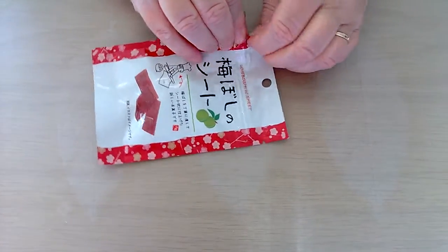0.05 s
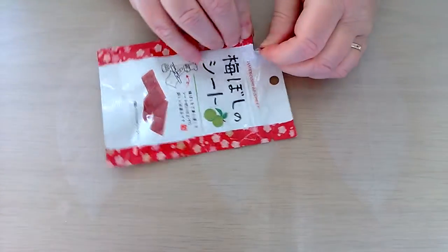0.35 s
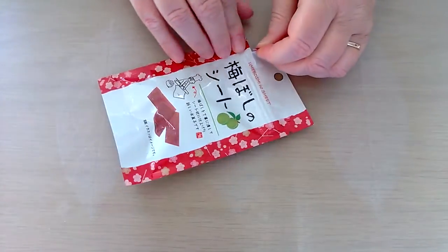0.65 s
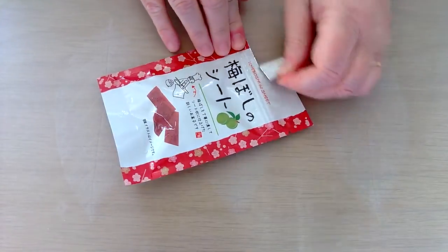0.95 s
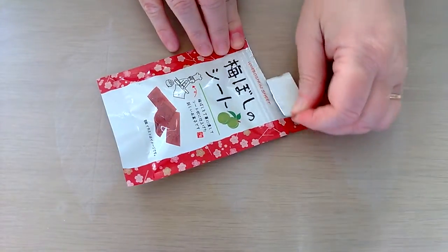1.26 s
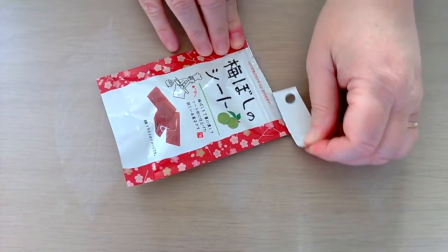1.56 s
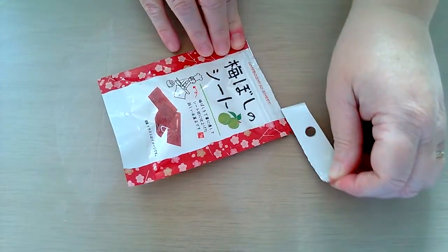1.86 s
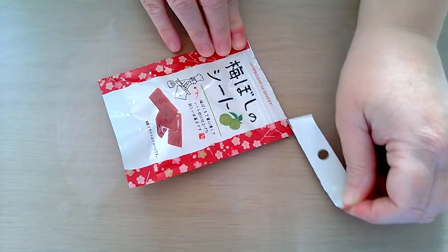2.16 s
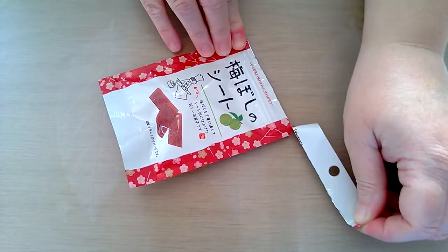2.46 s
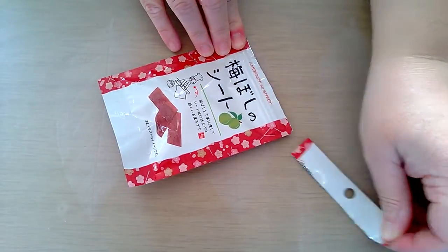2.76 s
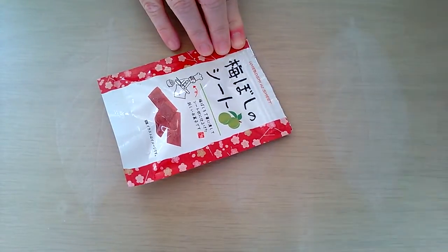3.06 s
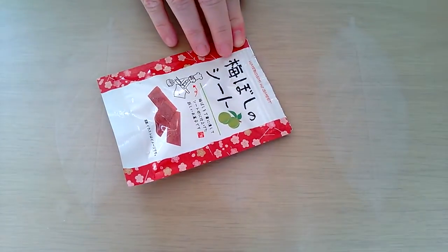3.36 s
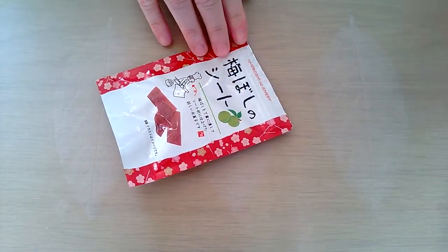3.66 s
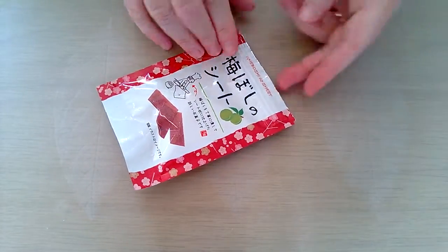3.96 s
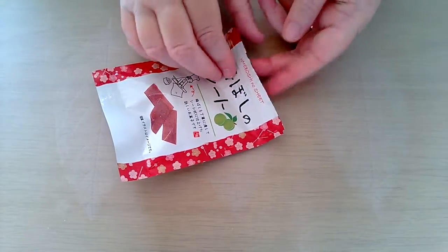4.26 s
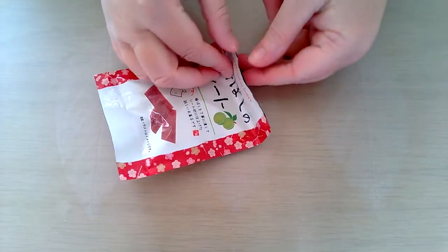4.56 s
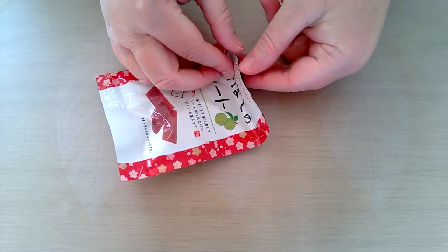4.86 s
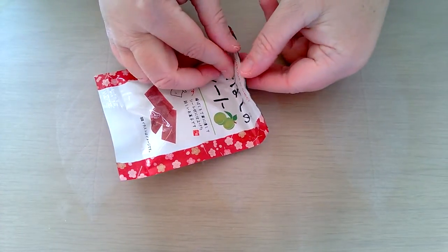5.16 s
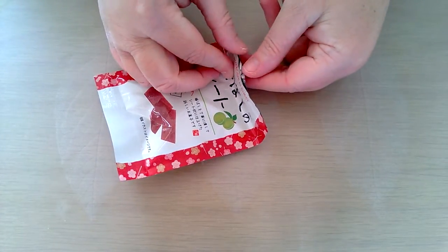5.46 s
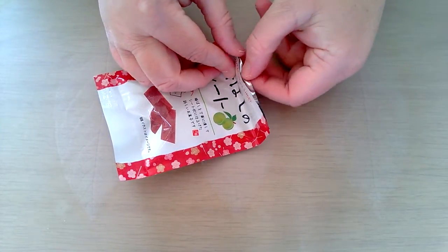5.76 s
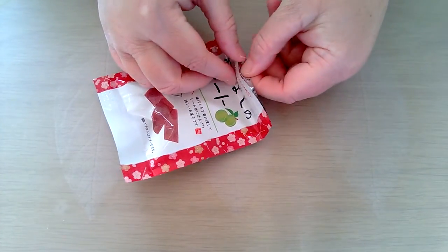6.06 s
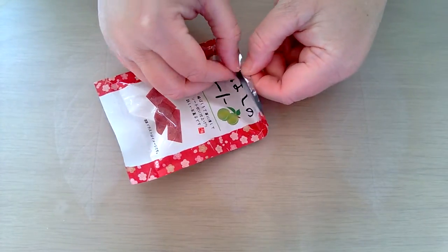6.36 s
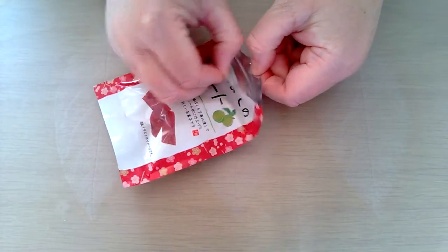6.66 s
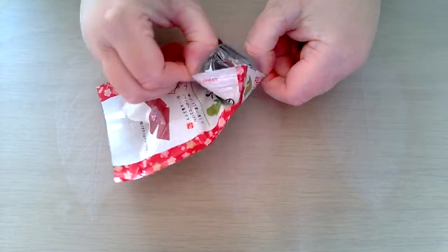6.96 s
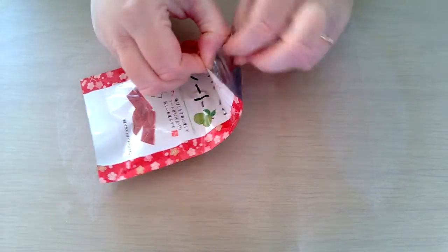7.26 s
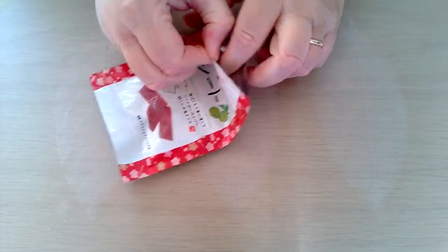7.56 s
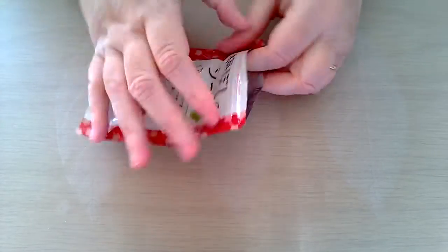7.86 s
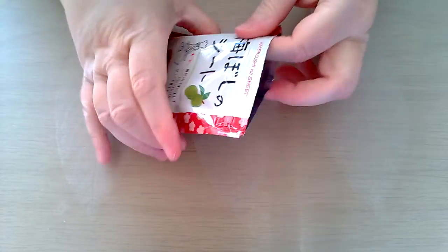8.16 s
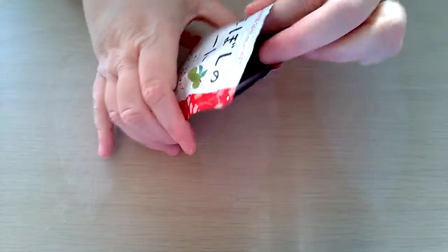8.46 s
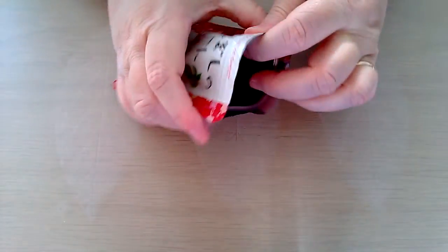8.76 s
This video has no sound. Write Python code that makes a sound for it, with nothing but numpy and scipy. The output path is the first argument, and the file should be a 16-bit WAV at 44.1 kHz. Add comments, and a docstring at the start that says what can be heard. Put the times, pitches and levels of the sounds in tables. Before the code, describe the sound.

Close snaps and crackles of a foil packet being opened on a table, with a small bird warbling and squawking in the background.

```python
"""Sharp snaps and a fine crinkle, close by: two hands tear the top strip off a foil snack pouch,
pick at its zip and pull it open, bumping and scuffing the table. Each snap is a crease flipping over;
many tiny creases make the crinkle. Across the room a small bird warbles in gliding whistles and
squawks with chopped air. A thin electronic whine lies over the quiet room."""
import sys
import numpy as np
from scipy import signal
from scipy.fft import rfft, irfft
from scipy.io import wavfile
from scipy.ndimage import uniform_filter1d

SR = 44100
rng = np.random.default_rng(int(sys.argv[2]) if len(sys.argv) > 2 else 0)


def wav_record(signal):
    """Record a signal, one row per channel, as 16-bit PCM in the file named by sys.argv[1]."""
    frames = np.transpose(np.atleast_2d(signal))
    bounded = np.clip(frames, -1, 1)
    # unit amplitude maps onto the largest positive 16-bit level
    quanta = np.round(bounded * 32767).astype(np.int16)
    wavfile.write(sys.argv[1], SR, quanta)


N = 392931
TIME = np.arange(N) / SR


def from_db(db):
    return 10 ** (np.asarray(db) / 20)


def rms_one(x):
    return x / np.sqrt(np.mean(x ** 2) + 1e-20)


def unit_energy(x):
    return x / np.sqrt(np.sum(x ** 2) + 1e-20)


def at_hz(points, hz):
    """Read between a table's rows on a log-frequency axis."""
    pitches, values = np.transpose(points)
    return np.interp(np.log(np.maximum(hz, 1)), np.log(pitches), values)


def add(track, s, sound):
    """Mix a sound into a track from time s on."""
    i = int(np.clip(s * SR, 0, N - 1))
    track[i:i + len(sound)] += sound[:N - i]


def colour(x, spectrum, size=4096):
    """Give a sound the tone of a (frequency, level) table; white noise keeps its power."""
    gains = from_db(at_hz(spectrum, np.fft.rfftfreq(size, 1 / SR)))
    cepstrum = irfft(np.log(gains))
    cepstrum[1:size // 2] *= 2  # minimum phase: nothing rings ahead of a click
    cepstrum[size // 2 + 1:] = 0
    response = irfft(np.exp(rfft(cepstrum)))
    return signal.oaconvolve(x, unit_energy(response))[:N]


def drift(rate, t):
    """A random wander that takes a new value, of size about 1, rate times a second."""
    knots = rng.standard_normal(int(t[-1] * rate) + 2)
    return np.interp(t * rate, np.arange(len(knots)), knots)


def swell(t, length, edge_s):
    """Fade in over edge_s, and out again after length; shorter calls never reach full level."""
    rise = np.clip(t / edge_s, 0, 1)
    fall = np.clip((length + edge_s - t) / edge_s, 0, 1)
    return np.sin(np.pi / 2 * rise * fall) ** 2


# tone of the quiet room and of the high hiss: (frequency [Hz], relative level [dB])
ROOM_TONE = [(20, -6), (45, -1), (70, -2), (120, 5), (175, -3), (205, -3), (240, 5), (290, -5), (480, -4),
             (700, -9), (1500, -10), (3000, -15), (6000, -31), (12000, -33)]
HISS_TONE = [(11500, -45), (13000, -14), (14500, -4), (15600, 0), (16300, -8), (17000, -25)]
def background(whine_hz=15623.8):
    """Low room noise, and the electronics' high hiss and unsteady whine."""
    air = from_db(-61.5) * colour(rng.standard_normal(N), ROOM_TONE)
    hiss = from_db(-64) * colour(rng.standard_normal(N), HISS_TONE)
    phase = 2 * np.pi * whine_hz * TIME + .3 * drift(500, TIME)
    whine = from_db(-51) * np.sqrt(2) * np.sin(phase)
    return air + hiss + whine


# how long the room rings: (frequency [Hz], time to fade by 60 dB [s])
ROOM_FADE = [(300, 0.49), (3000, 0.25), (6000, 0.24), (16000, 0.19)]
def room(x, gap_s, dense_s):
    """The room's echoes: a few after a gap, then ever more, with the treble dying first."""
    t, tail = TIME[:SR // 2], 0
    density = np.minimum((t / dense_s) ** 2 + 0.0033, 1)  # share of samples that hold an echo
    echoes = rng.standard_normal(len(t)) * (rng.random(len(t)) < density) / np.sqrt(density)
    edges = np.geomspace(100, 17000, 13)
    for low, high in zip(edges, edges[1:]):
        band = signal.sosfiltfilt(signal.butter(2, [low, high], "band", fs=SR, output="sos"), echoes)
        tail = tail + band * 1000. ** (-t / at_hz(ROOM_FADE, np.sqrt(low * high)))
    fade_in = np.clip(t / gap_s - 1, 0, 1)
    return signal.oaconvolve(x, unit_energy(tail * fade_in))[:N]


MIDDLE_NOTE_HZ = 3006
def warble(notes, waver, waver_hz, edge_s, buzz, buzz_hz):
    """The bird sings each note as a gliding, wavering, buzzy tone with a weak octave above."""
    out, t = np.zeros(N), TIME[:SR // 6]
    for s, length, first_hz, last_hz, db in notes:
        glide_hz = first_hz * (last_hz / first_hz) ** np.minimum(t / length, 1)
        hz = glide_hz * (1 + waver * drift(waver_hz, t))
        phase = 2 * np.pi * np.cumsum(hz) / SR
        tone = np.sin(phase) + from_db(-28) * np.sin(2 * phase)
        # high notes are pressed harder and buzz more
        flutter = 1 + buzz * first_hz / MIDDLE_NOTE_HZ * drift(buzz_hz, t)
        add(out, s, from_db(db) * swell(t, length, edge_s) * flutter * tone)
    return out


# the bird's soft phrases: (start [s], end [s], level [dB])
CHATTER_PHRASES = [(0.2, .61, -49.5), (0.894, 1.12, -62), (1.275, 1.43, -58), (1.504, 1.9, -56),
                   (2.049, 2.582, -52.5), (3.025, 3.316, -52.5), (3.721, 4.002, -54.5), (4.523, 5.03, -52),
                   (5.044, 5.6, -55.5), (5.676, 5.8, -46), (6.427, 6.54, -49), (7.149, 7.68, -48.5),
                   (8.271, 8.616, -50.5)]
def chatter(per_s=60, centre_hz=1985, glide_octaves=0.2135, note_s=0.01633):
    """The bird runs tiny syllables together, each with its own random pitch and slide."""
    notes = []
    for start, end, db in CHATTER_PHRASES:
        times = np.arange(start, end, 1 / per_s)
        for s, (late, long, high, slide, loud) in zip(times, rng.uniform(-1, 1, size=(200, 5))):
            octaves = 0.68 * high
            first_hz = centre_hz * 2 ** octaves
            last_hz = first_hz * 2 ** (glide_octaves * slide)
            note_db = db + 7 * loud + 2.5 * octaves  # higher syllables are louder
            notes.append((s + late / per_s / 2, note_s * 2 ** (long / 2), first_hz, last_hz, note_db))
    return warble(notes, waver=0.026, waver_hz=412, edge_s=0.01, buzz=1.42, buzz_hz=495)


# the bird's clear notes: (time [s], starting pitch [Hz], glide [octaves], level [dB])
WHISTLE_NOTES = [(0.159, 2733, -0.43, -37.5), (0.603, 2420, 0.31, -40.5), (0.846, 3700, -0.16, -41),
                 (1.021, 3020, -0.31, -47), (1.159, 1850, 0.19, -43), (1.191, 1780, -.12, -64),
                 (1.206, 3494, -.22, -35.5), (1.234, 2863, 0.48, -22), (1.78, 1585, -0.39, -49.5),
                 (1.871, 1310, -0.13, -51.5), (1.92, 2460, -.03, -49.5), (2.06, 2065, 0.39, -43.5),
                 (2.128, 3520, -0.076, -44), (2.139, 2693, -0.57, -41.5), (2.281, 2875, -0.45, -46),
                 (2.345, 3616, -0.093, -45), (3.071, 2540, -0.2, -52), (3.239, 2270, 0.41, -38.5),
                 (3.311, 3540, 0.038, -37.5), (3.362, 2850, 0.0037, -36.5), (3.776, 2930, -0.18, -49),
                 (3.81, 2130, -0.23, -48.5), (3.995, 3777, -0.072, -33), (4.028, 3604, -0.22, -28.5),
                 (4.058, 3285, -0.088, -25.5), (4.095, 1990, 0.38, -32), (4.103, 4370, 0.099, -34),
                 (4.351, 4110, -0.078, -32), (4.519, 2370, -0.15, -48.5), (4.733, 3665, -0.31, -40.5),
                 (4.858, 2190, .11, -42), (4.958, 3220, 0.092, -44), (5.177, 3575, -0.25, -39),
                 (5.627, 3700, -0.34, -40.5), (5.898, 3200, 0.13, -35.5), (5.985, 2775, -0.14, -41),
                 (6.019, 3600, -0.3, -47.5), (6.05, 2260, -0.4, -44.5), (6.297, 2770, -0.3, -45),
                 (6.761, 2700, -0.22, -40.5), (6.799, 3660, 0.033, -38.5), (7.197, 3176, -0.25, -40),
                 (7.224, 1897, 0.25, -37.5), (7.406, 3390, -0.27, -37), (7.42, 2370, -0.28, -36),
                 (7.479, 3600, .38, -30.5), (7.49, 5160, 0.012, -40)]
def whistles():
    """The bird whistles, drawing out its low notes and flicking its rising ones."""
    notes = []
    for s, hz, glide, db in WHISTLE_NOTES:
        length = .047 * (MIDDLE_NOTE_HZ / hz) ** 1.3 * (.55 if glide > 0 else 1)
        notes.append((s, length, hz, hz * 2 ** glide, db))
    return warble(notes, waver=0.031, waver_hz=498, edge_s=0.0061, buzz=0.84, buzz_hz=802)


# tone of the bird's rasp: (frequency [Hz], relative level [dB])
RASP_TONE = [(400, -49), (850, -30.5), (1300, -16.5), (2000, -7.5), (3300, 2), (4200, 0), (6300, 0),
             (10000, -0.5), (12500, -5.5), (16000, -5.5)]
# raspy calls: (time [s], length before fading [s], level before fades [dB], treble limit [Hz])
SQUAWK_CALLS = [(0, 0.0017, -19, 6850), (1.215, 0.042, -48.5, 6700), (1.768, 0.028, -51, 4260),
                (1.905, 0.0098, -44.5, 9100), (2.363, 0.024, -53.5, 3460), (2.602, 0.039, -26.5, 6400),
                (2.75, 0.038, -21.5, 8900), (3.583, 0.017, -44.5, 2330), (3.819, 0.019, -37, 14500),
                (4.059, 0.038, -40, 6030), (4.277, 0.059, -29, 6020), (4.854, 0.0095, -49, 6400),
                (4.91, 0.015, -41, 4414), (5.284, 0.013, -42, 3457), (5.869, 0.046, -32.5, 9050),
                (6.896, 0.023, -26.5, 6160)]
def squawks(pulse_hz=328.6, depth=0.6):
    """Harsh calls swell in: air chopped unevenly by the syrinx, the bird's voice box."""
    out, t = np.zeros(N), TIME[:SR // 6]
    air = colour(rng.standard_normal(N), RASP_TONE)
    for s, length, db, bright_hz in SQUAWK_CALLS:
        i = rng.integers(N - len(t))
        chop_hz = pulse_hz * (1 + 0.13 * drift(91, t))
        chop = 1 + depth * np.sin(2 * np.pi * np.cumsum(chop_hz) / SR)
        treble_cut = signal.butter(2, bright_hz, fs=SR, output="sos")
        call = signal.sosfilt(treble_cut, air[i:i + len(t)] * chop)
        add(out, s, from_db(db) * rms_one(call) * swell(t, length, edge_s=.034))
    return out


# tone of a scuff: (frequency [Hz], relative level [dB])
SCUFF_TONE = [(80, -9), (300, -6.5), (800, -9), (1300, -14), (9000, -41)]
# slides on the table top: (start [s], end [s], level [dB])
TABLE_SLIDES = [(3.26, 3.338, -54), (3.501, 3.68, -52), (3.872, 4.37, -57.5), (6.633, 7.187, -59.5),
                (7.275, 7.515, -60.5), (7.669, 8.25, -57.5), (8.623, 8.918, -49.5)]
def slides(patchy_db=6.0):
    """Hand and pouch slide on the table with a dull, uneven scuff."""
    force = np.zeros(N)
    for start, end, db in TABLE_SLIDES:
        add(force, start, from_db(db) * signal.windows.tukey(int((end - start) * SR), .5))
    return force * from_db(patchy_db * drift(40, TIME)) * colour(rng.standard_normal(N), SCUFF_TONE)


# dull knocks on the table top: (time [s], pitch [Hz], level [dB])
TABLE_BUMPS = [(3.513, 100, -33.5), (3.542, 120, -39), (6.663, 44.7, -46.5), (8.77, 256, -53),
               (8.814, 474, -27.5)]
def bumps(cycles_to_peak=0.52):
    """Soft knocks of hand and pouch rock the table top for a cycle or two."""
    out, t = np.zeros(N), TIME[:SR // 5]
    for s, hz, db in TABLE_BUMPS:
        age = t * hz / cycles_to_peak
        add(out, s, from_db(db) * np.sin(2 * np.pi * hz * t) * age * np.exp(1 - age))
    return out


# tone of a cracking crease and of the foil panel round it: (frequency [Hz], relative level [dB])
CRACK_TONE = [(1000, -3.5), (3500, 5.5), (5500, -1.5), (8200, 6.5), (10000, 3), (12300, -6), (15000, -4.5),
              (16500, -56)]
PANEL_TONE = [(100, -47), (450, 8), (700, -6.5), (950, -3), (1500, -3), (2200, 1.5), (3600, 2),
              (5500, -15.5), (16000, -36.5)]
def foil_tone(cracks, panel):
    """Foil has two voices: creases crack brightly, and the flexing panel sounds lower."""
    return colour(cracks, CRACK_TONE) + colour(panel, PANEL_TONE)


def radiate(foil, flat_hz=1300, open_hz=840, zip_parts_s=6.6):
    """A small thin sheet gives off little bass, a bit more once the pouch stands open."""
    parts = [(flat_hz, TIME < zip_parts_s), (open_hz, TIME >= zip_parts_s)]
    return sum(signal.sosfilt(signal.butter(3, hz, "high", fs=SR, output="sos"), foil * when)
               for hz, when in parts)


# tearing the strip and picking at the zip: (start [s], end [s], crackle [dB], panel [dB])
FINGER_TOUCHES = [(0.354, 0.735, -59, -44.5), (0.807, 1.067, -53, -45), (1.465, 1.789, -65, -52),
                  (2.044, 2.23, -61, -55), (2.448, 2.503, -52, -50.5), (2.516, 2.572, -37.5, -40),
                  (5.065, 5.145, -62, -64), (5.224, 5.533, -64, -50.5), (6.107, 6.185, -56, -48),
                  (6.45, 6.489, -44.5, -50)]
# pulling the pouch open: (time [s], crackle [dB], panel's low tones [dB])
LONG_PULL = [(6.65, -75, -65), (6.71, -51, -50), (6.82, -54, -55), (6.89, -54, -53), (7.0, -53, -51.5),
             (7.12, -62, -52.5), (7.3, -49.5, -73), (7.37, -64, -77), (7.49, -36, -47.5),
             (7.67, -42, -53.5), (7.9, -48, -52), (8.34, -53, -68), (8.48, -53, -62), (8.91, -44.5, -47.5)]
def handling():
    """How strongly the hands make the foil crackle and flex: single touches, then the long pull."""
    times, *levels = np.transpose(LONG_PULL)
    crackle, lows = [from_db(np.interp(TIME, times, db)) * (TIME >= times[0]) for db in levels]
    flex = from_db(13.5) * lows  # the whole panel is louder than its low tones
    for start, end, crackle_db, flex_db in FINGER_TOUCHES:
        press = signal.windows.tukey(int((end - start) * SR), .15)
        add(crackle, start, from_db(crackle_db) * press)
        add(flex, start, from_db(flex_db) * press)
    return crackle, flex


def crinkle(base_per_s=130, spread_db=5.5, clump_db=5.0, grain_s=0.0007, rub=0.29):
    """Tiny creases give way in clumps, over the faint rub of skin on foil."""
    sizes = from_db(spread_db * np.minimum(rng.exponential(1, N), 3.2))
    gives_way = rng.random(N) < base_per_s * from_db(clump_db * drift(40, TIME)) / SR
    decay = np.exp(-2 / (grain_s * SR))
    power = signal.lfilter([1], [1, -decay], gives_way * sizes ** 2 + 1e-18) + rub ** 2
    grains = np.sqrt(power / uniform_filter1d(power, size=SR // 5))  # evened out: the hands set the level
    crackle, flex = handling()
    return foil_tone(crackle * grains * rng.standard_normal(N), flex * grains * rng.standard_normal(N))


# the loudest creases: (time [s], ring level [dB], ring pitch [Hz], crack level [dB])
LOUD_CREASES = [(0.1078, -14.5, 3580, -19.5), (0.1351, -30, 2754, -23.5), (0.1358, -11, 2600, -19.5),
                (0.383, -26.5, 1930, -48.5), (0.5023, -25.5, 2340, -46), (0.5642, -21.5, 2630, -28),
                (0.6443, -22, 2630, -25), (0.6653, -14, 2680, -24.5), (0.827, -32, 2780, -43),
                (0.8444, -22.5, 3300, -55), (0.8929, -28, 3100, -32.5), (1.0853, -38, 2610, -43.5),
                (2.0715, -24.5, 2280, -37.5), (2.1964, -26.5, 1900, -31.5), (2.5243, -30, 3130, -27),
                (4.1464, -14, 2300, -43), (4.4924, -17, 2960, -42), (5.0704, -31, 3700, -59),
                (5.1213, -34, 3540, -36.5), (5.131, -48, 3720, -31.5), (5.8285, -24, 3010, -31.5),
                (6.0968, -31.5, 1830, -34.5), (6.1854, -43, 2050, -28), (6.2425, -15, 2310, -28),
                (6.4386, -16, 2880, -31.5), (6.6433, -7.5, 2500, -36), (6.6665, -13, 2880, -28.5),
                (6.784, -17.5, 2350, -32.5), (6.8545, -7.5, 2940, -19), (6.871, -27, 2940, -29),
                (6.9098, -13.5, 2150, -24), (6.9134, -15, 3100, -21), (6.995, -32, 2020, -28.5),
                (7.0313, -21, 2700, -26), (7.3062, -8, 2610, -31), (7.311, -10.5, 3260, -20.5),
                (7.3791, -15, 2730, -24.5), (7.5991, -16.5, 3000, -40), (7.6573, -9, 4280, -20),
                (7.73, -12.5, 2860, -16), (7.7594, -8, 3800, -28), (7.7783, -12.5, 2470, -14.5),
                (7.7846, -17, 2030, -21.5), (7.8111, -6, 3520, -21), (7.9712, -6.5, 3600, -19),
                (8.0466, -17, 3000, -48), (8.066, -15, 3120, -38), (8.114, -12, 2980, -34),
                (8.1227, -15, 2020, -29), (8.1792, -10.5, 2870, -22.5), (8.2541, -7.5, 3700, -16.5),
                (8.3448, -15.5, 2930, -25), (8.419, -16.5, 2320, -34.5), (8.4623, -7, 2310, -18),
                (8.6304, -11.5, 3420, -28.5), (8.7393, -16, 2120, -29), (8.746, -9.5, 2800, -20),
                (8.773, -6, 2370, -17), (8.8835, -12.5, 3540, -24.5)]
def crease_chains(neighbours=2, mean_wait_s=.008, mean_loss_db=13.5, scatter_octaves=0.35):
    """Each loud crease sets off its neighbours, one after another and ever weaker."""
    rows = []
    chains = rng.random((len(LOUD_CREASES), neighbours, 3))
    for (s, ring_db, hz, crack_db), chain in zip(LOUD_CREASES, chains):
        rows.append((s, ring_db, hz, crack_db))
        for wait, weak, high in chain:
            s -= mean_wait_s * np.log(1 - wait)  # the log is negative, so time moves on
            loss_db = mean_loss_db * (.5 + weak)
            ring_db, crack_db = ring_db - loss_db, crack_db - loss_db
            rows.append((s, ring_db, hz * 2 ** (scatter_octaves * (2 * high - 1)), crack_db))
    return rows


def snaps(ring_cycles=1.7, give_s=0.0002, panel_s=0.0014, crack_s=0.00096, flutter_s=0.0092):
    """A crease flips: a bright crack, a few cycles of ring, and a brief flutter of the panel round it."""
    rings, panel, cracks = np.zeros((3, N))
    t = TIME[:SR // 30]
    flutter = 0.086 * np.exp(-t / flutter_s)
    giving_way = 1 - np.exp(-t / give_s)
    for s, ring_db, hz, crack_db in crease_chains():
        panel_noise, crack_noise = rng.standard_normal((2, len(t))) * giving_way
        age = t * hz / ring_cycles
        ring = np.sin(2 * np.pi * hz * t) * np.sqrt(age) * np.exp(-age) * rng.choice([-1, 1])
        ring = from_db(ring_db) * ring / np.abs(ring).max()
        flex = unit_energy(panel_noise * (np.exp(-t / panel_s) + flutter))
        crack = unit_energy(crack_noise * (np.exp(-t / crack_s) + flutter / 2))
        add(rings, s, ring)
        add(panel, s, from_db(-2) * np.linalg.norm(ring) * flex)
        add(cracks, s, from_db(crack_db) * np.sqrt(0.0036 * SR) * crack)  # energy of 3.6 ms at that level
    return rings + foil_tone(cracks, panel)


def scene():
    """The pouch is close, with little echo; the bird is heard mostly through the room."""
    hands = radiate(snaps() + crinkle()) + bumps() + slides()
    bird = chatter() + whistles() + squawks()
    near = hands + from_db(-13.5) * room(hands, gap_s=0.0032, dense_s=0.11)
    far = bird + from_db(2.5) * room(bird, gap_s=0.0014, dense_s=0.08)
    return (near + far + background())[None]


def record(dry):
    """The sharpest peaks overload softly and the highest treble is cut."""
    ceiling, cutoff_hz = .7, 16900
    rounded = dry / (1 + (dry / ceiling) ** 4) ** (1 / 4)
    return signal.sosfilt(signal.ellip(10, .2, 70, cutoff_hz, fs=SR, output="sos"), rounded)


dry = scene()
out = record(dry)
wav_record(out)
```